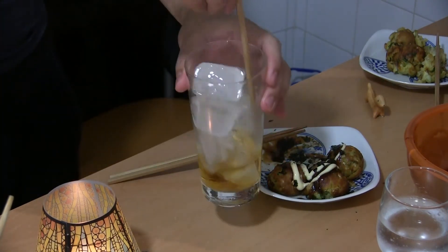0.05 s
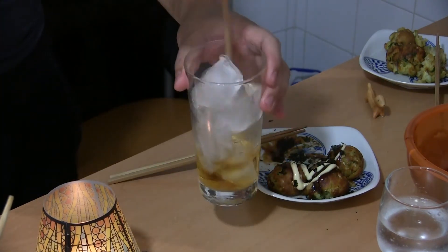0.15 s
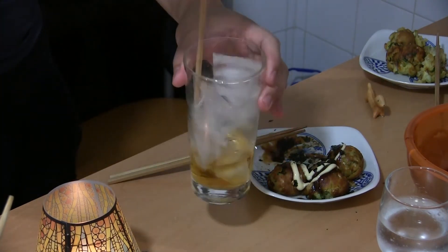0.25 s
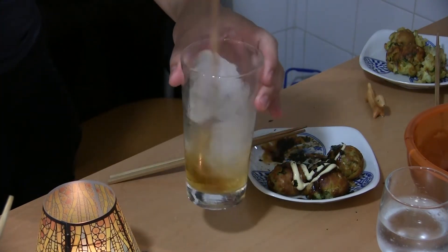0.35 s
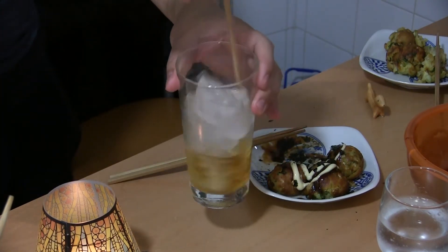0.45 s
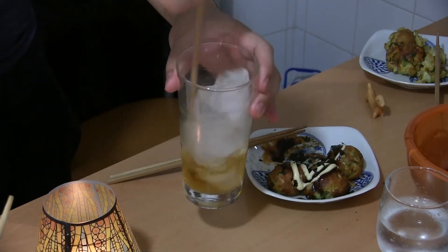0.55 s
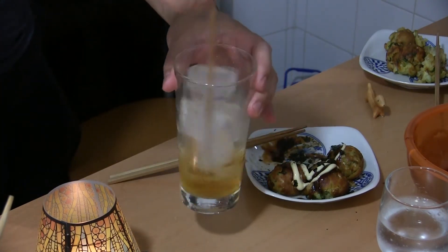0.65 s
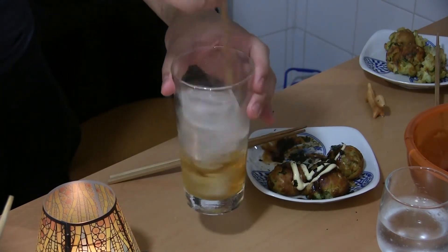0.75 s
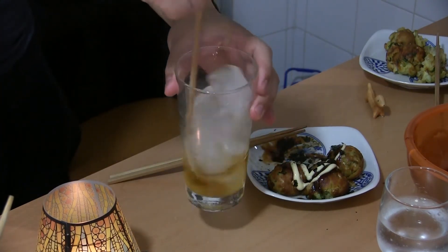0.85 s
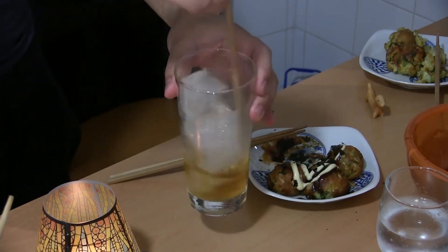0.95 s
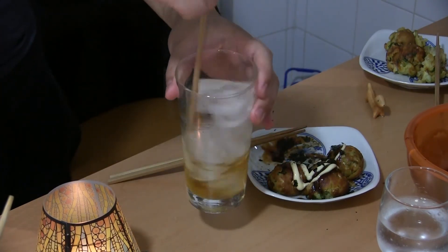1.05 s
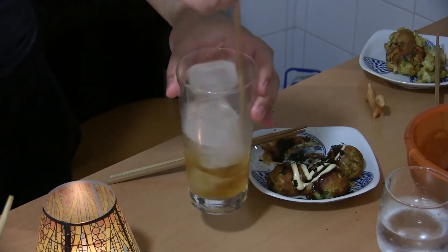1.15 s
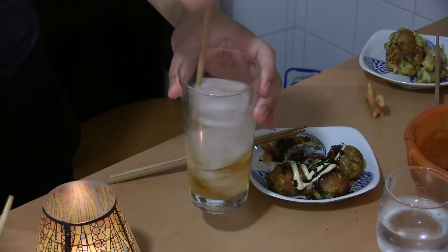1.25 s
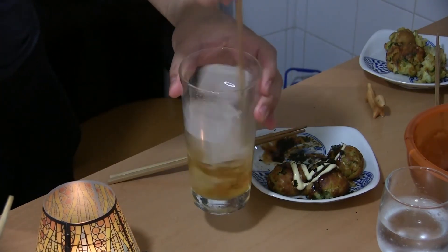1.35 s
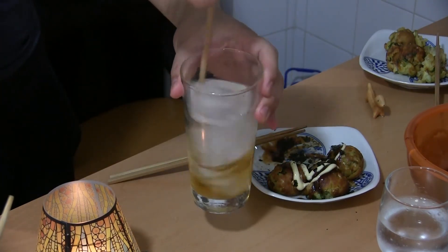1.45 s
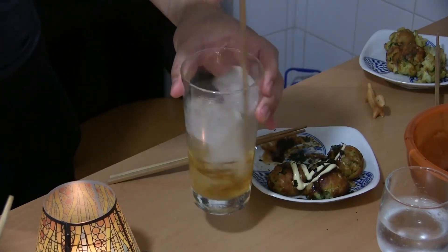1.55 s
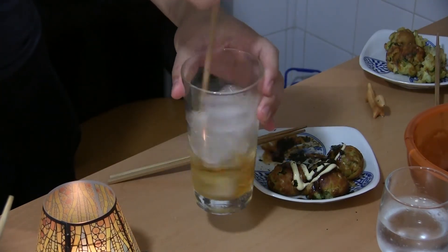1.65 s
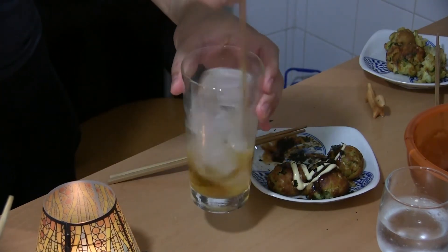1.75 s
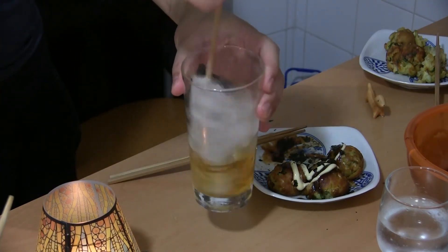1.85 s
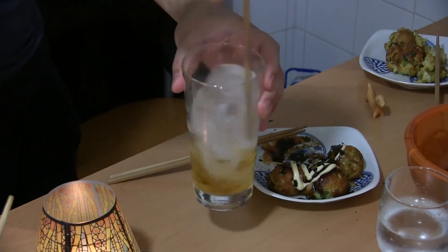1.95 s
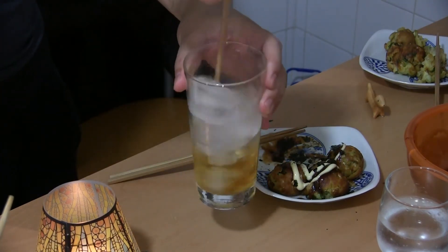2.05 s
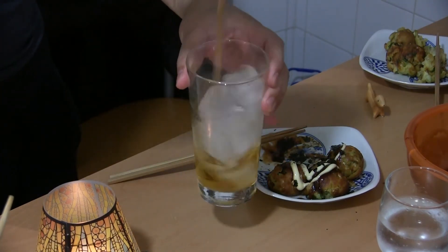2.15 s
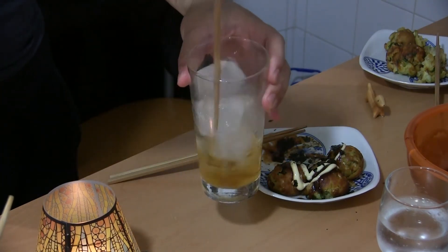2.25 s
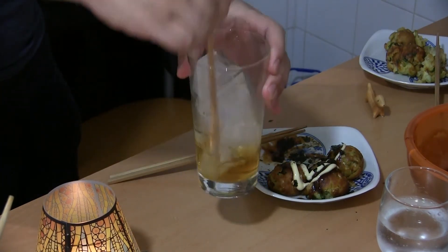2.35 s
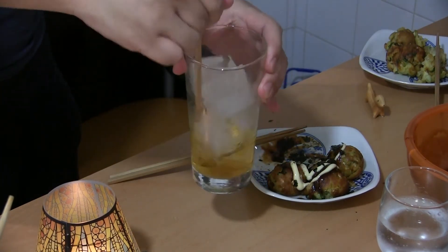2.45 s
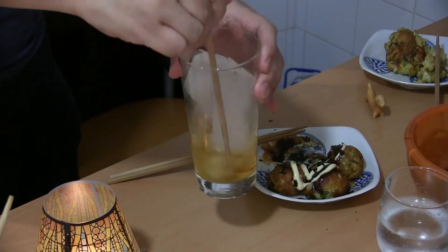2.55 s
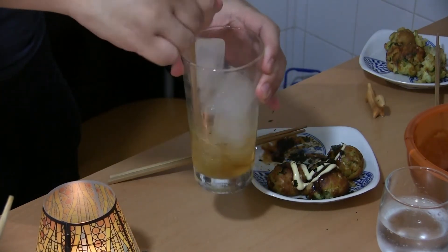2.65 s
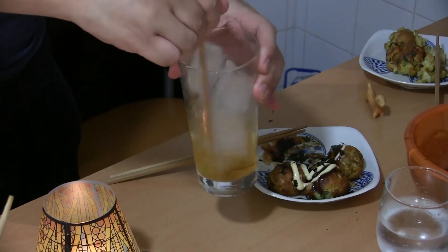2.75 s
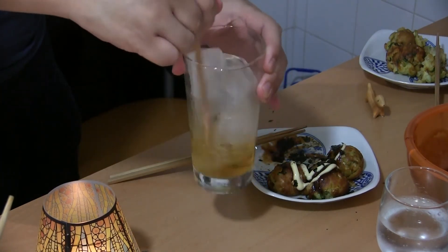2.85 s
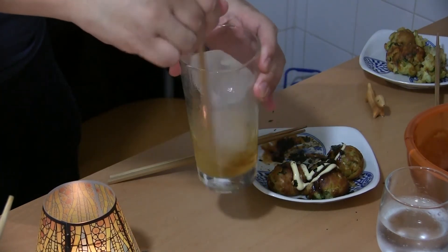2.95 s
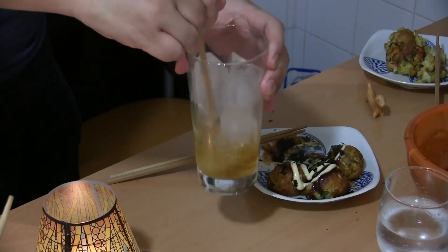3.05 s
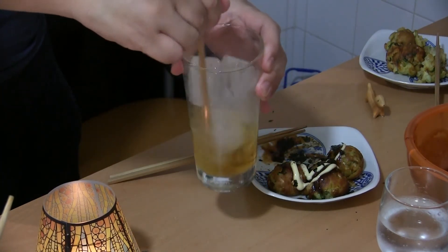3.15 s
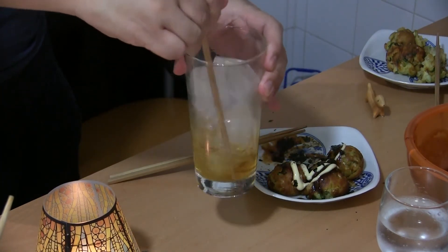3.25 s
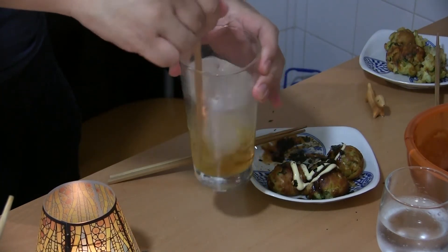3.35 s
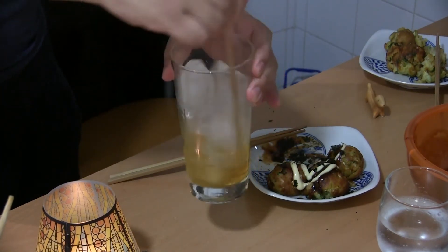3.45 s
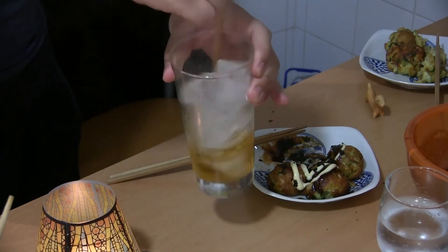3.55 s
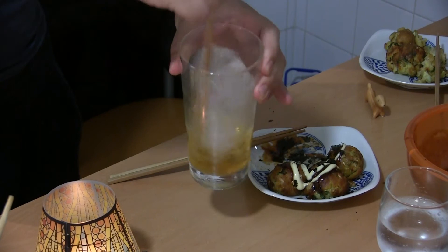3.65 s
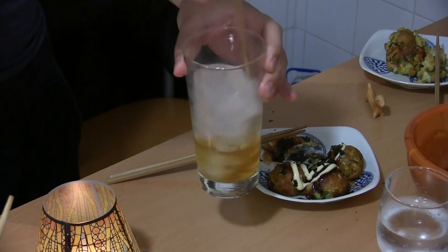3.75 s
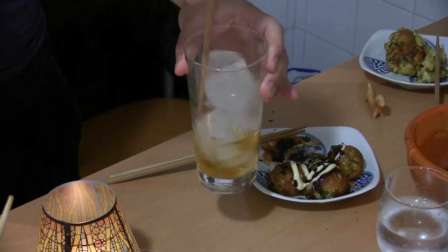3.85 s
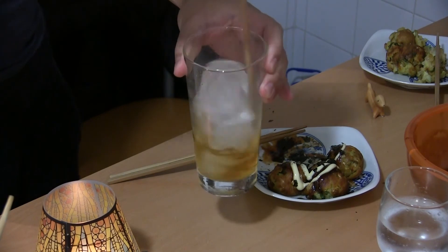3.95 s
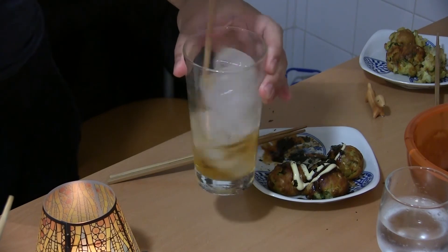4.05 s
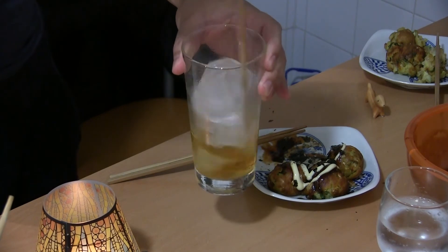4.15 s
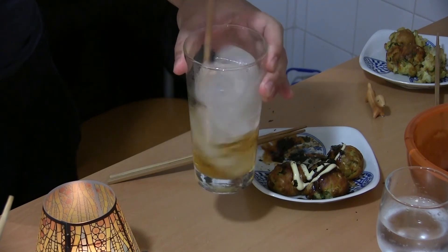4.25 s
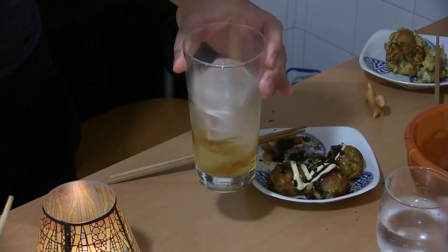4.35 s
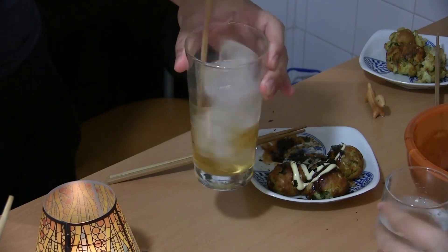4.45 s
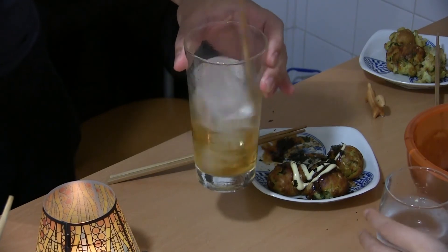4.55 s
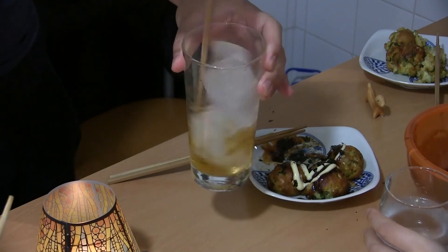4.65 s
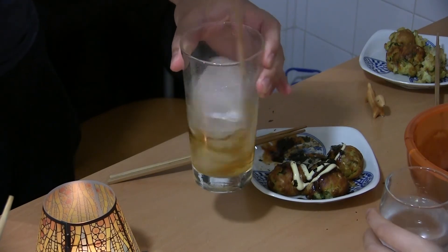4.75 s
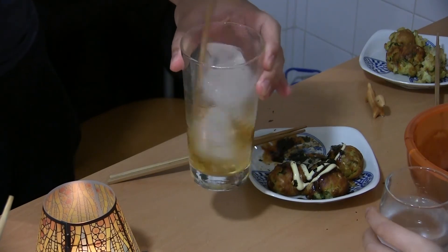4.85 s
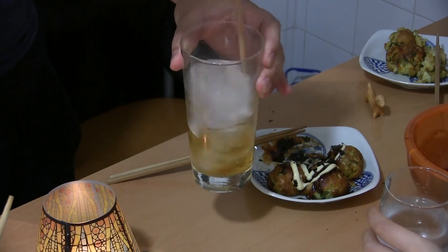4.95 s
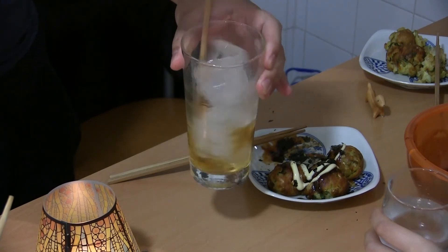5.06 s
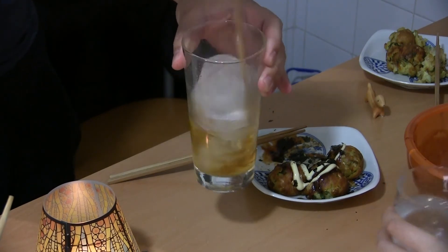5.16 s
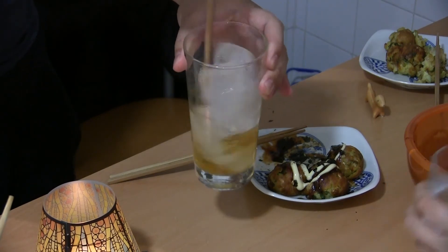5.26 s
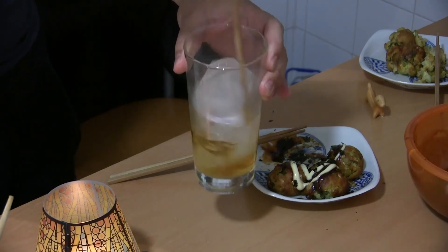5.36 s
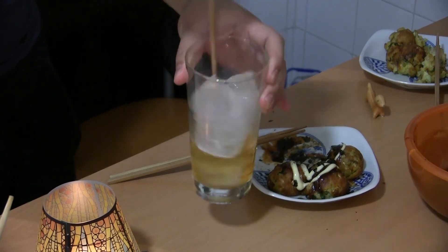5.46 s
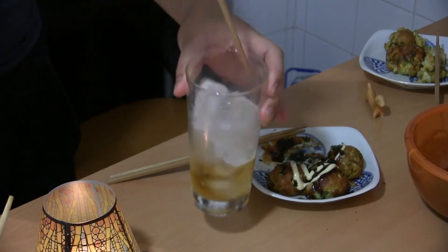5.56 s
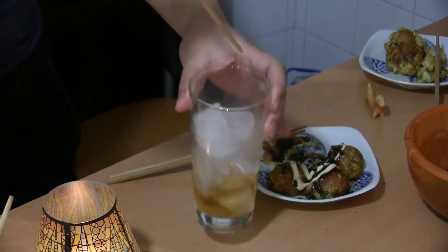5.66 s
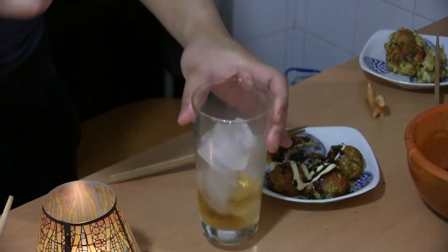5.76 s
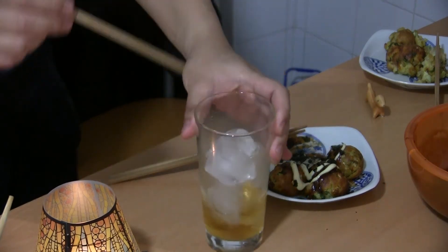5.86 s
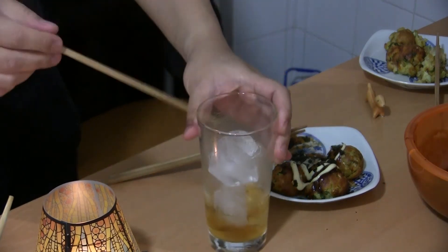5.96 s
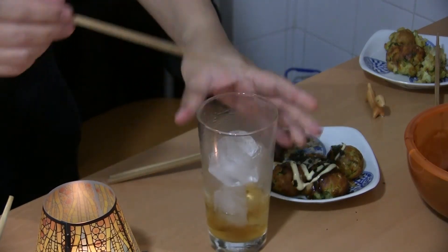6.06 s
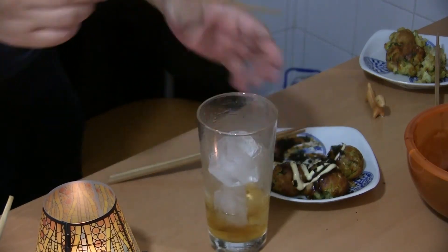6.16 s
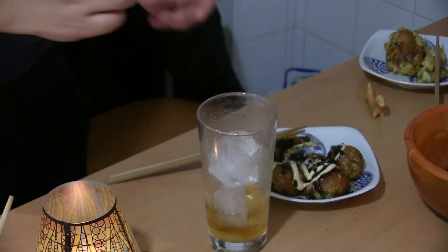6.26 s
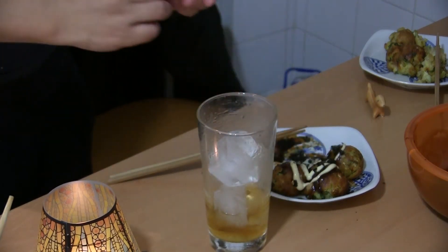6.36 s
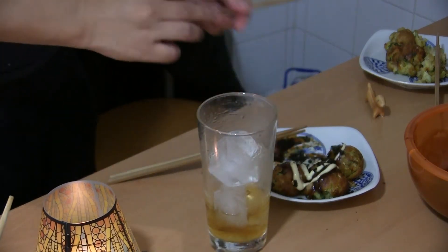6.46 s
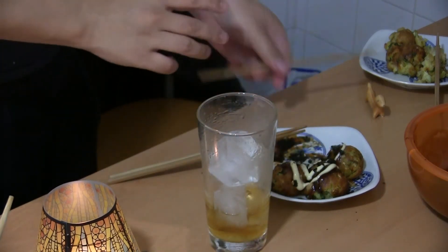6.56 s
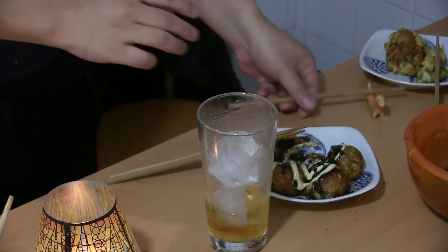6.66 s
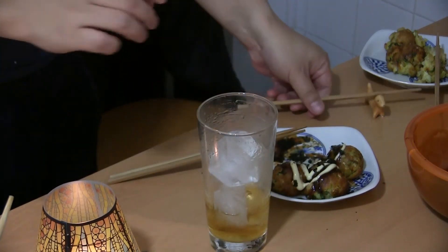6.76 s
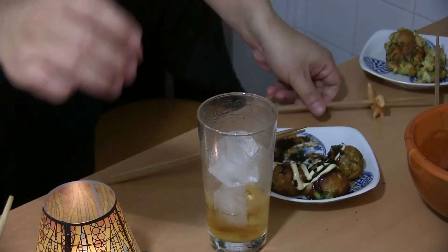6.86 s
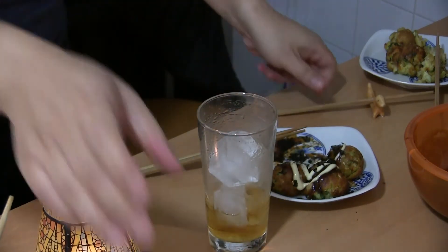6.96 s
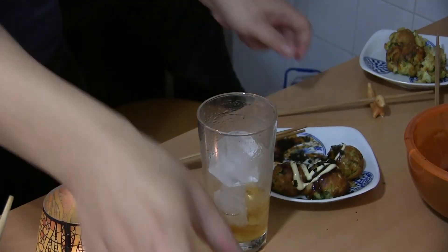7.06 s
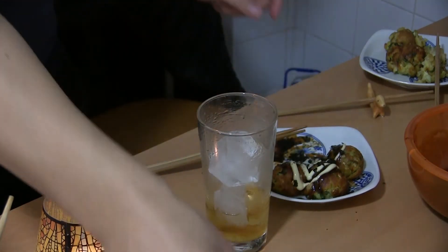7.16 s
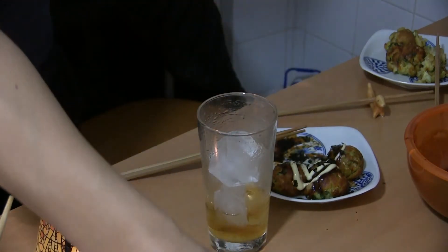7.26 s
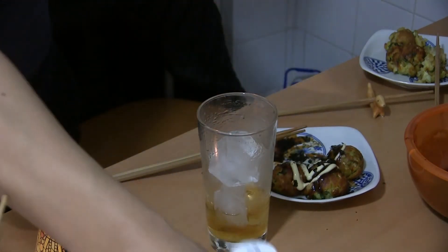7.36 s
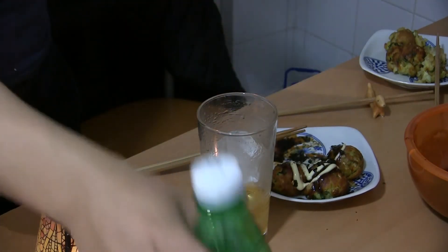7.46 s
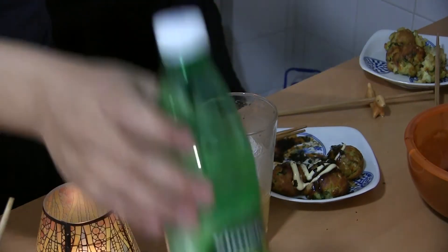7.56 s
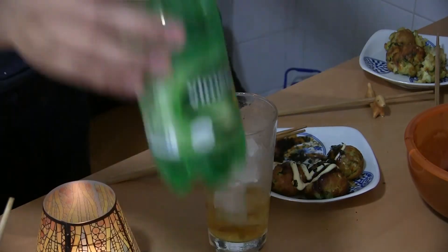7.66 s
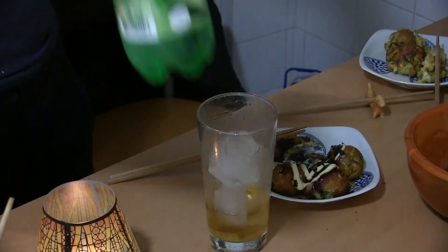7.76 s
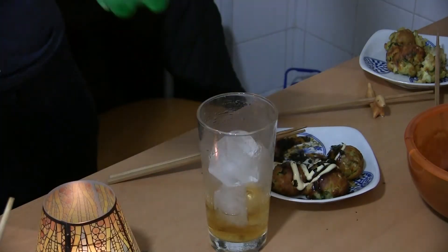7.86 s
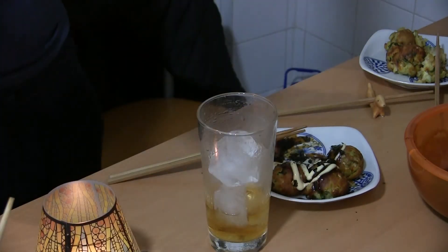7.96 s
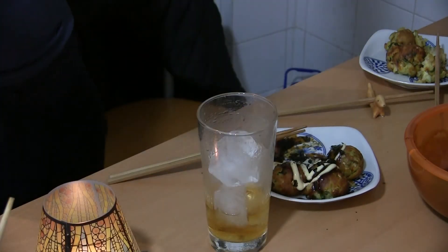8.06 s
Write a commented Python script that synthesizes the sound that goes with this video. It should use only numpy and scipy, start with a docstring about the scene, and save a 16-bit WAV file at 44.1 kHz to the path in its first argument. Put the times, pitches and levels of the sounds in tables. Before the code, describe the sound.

Close up in a small, tiled kitchen, ice is stirred briskly in a glass: dense, uneven knocks, bright clacks and hollow clunks, slackening briefly near one second and growing busiest around three. Near six seconds the tumbler is put down on wood with a loud, short thud and a tiny rattle. A chopstick ticks lightly against a dish, and crockery clinks once quietly. A faint low hum and room hiss continue to the end.

```python
"""Ice cubes knock about in a hand-held tumbler stirred with a chopstick, in a small tiled kitchen:
each blow sums decaying modes of wall and air hollow with short bursts of contact noise.
The tumbler is set down on a wooden table (table modes and a thud), the chopstick taps a dish
(wood and dish modes), and crockery clinks once. An appliance hums, a wavering sine, under room noise
shaped from random spectra; a gain control rides the loudest blows."""
import sys
import numpy as np
from scipy import signal
from scipy.fft import rfft, irfft
from scipy.io import wavfile
from scipy.ndimage import uniform_filter1d

SR = 44100
rng = np.random.default_rng(int(sys.argv[2]) if len(sys.argv) > 2 else 0)


def put_to_file(sound):
    """Save the sound as 16-bit audio at rate SR, in the file named by the first command-line argument."""
    columns = np.atleast_2d(sound).T  # one column per channel
    safe = np.clip(columns, -1, 1)
    whole_steps = np.round(safe * 32767)
    wavfile.write(sys.argv[1], SR, whole_steps.astype(np.int16))


N = 357651  # length in samples


def gain_of(db):
    """Level law: amplitude ratio is ten to the power of decibels over twenty."""
    return 10 ** (np.asarray(db) / 20)


def evened(x):
    """Normalization to unit root-mean-square amplitude."""
    return x / np.sqrt(np.mean(x ** 2) + 1e-20)


def read(points, hz):
    """Interpolation of a spectrum table along a logarithmic frequency axis."""
    f, value = np.transpose(points)
    return np.interp(np.log(hz + 1), np.log(f + 1), value)


def add(mix, s, sound):
    """Superposition: sums a sound in at second s, which may lie before the start."""
    at = round(s * SR)
    part, sound = mix[max(at, 0):], sound[max(-at, 0):]
    part[:len(sound)] += sound[:len(part)]


def highpass(x, order, hz):
    """Butterworth filtering: removes the part of a sound below hz."""
    return signal.sosfilt(signal.butter(order, hz, "high", fs=SR, output="sos"), x)


def rings(modes, size=4000, cycles=0.33, detune=0.):
    """Modal decay: one dying sine a row; contact time softens the start, loading detunes each mode."""
    hz, db, t60 = np.transpose(modes)[:, :, None]
    hz = hz * (1 + detune * rng.standard_normal(hz.shape))
    t = np.arange(size) / SR
    start = 1 - np.exp(-t * hz / cycles)
    return hz[:, 0], start * gain_of(db - 60 * t / t60) * np.sin(2 * np.pi * hz * t)


def strike(modes, chance, spread_db, near_hz=None, focus_db=0, broad_db=0):
    """Modal excitation: the spot struck sets sign and strength of each mode, favouring near_hz; peak 1."""
    hz, rows = modes
    chance = chance[:len(hz)]
    weight_db = spread_db * np.abs(chance)
    if near_hz:
        apart = np.log(hz / near_hz)
        weight_db = weight_db + focus_db * np.exp(-(apart / 0.076) ** 2)
        weight_db = weight_db + broad_db * np.exp(-(apart / 1.2) ** 2)
    sound = (np.sign(chance) * gain_of(weight_db)) @ rows
    return sound / np.abs(sound).max()


def crack(colour, noise, decay_s):
    """Brief contact excites a broad spectrum: a short burst of coloured noise of peak 1."""
    t, hz = np.arange(len(noise)) / SR, np.fft.rfftfreq(len(noise), 1 / SR)
    burst = irfft(rfft(noise) * gain_of(read(colour, hz)))
    burst *= (1 - np.exp(-t / 0.0005)) * np.exp(-t / decay_s)
    return burst / np.abs(burst).max()


def resonance(db, hz, t60_s, rise_s):
    """Single damped resonator: a sine with an exponential rise and decay."""
    t = np.arange(2000) / SR
    return gain_of(db - 60 * t / t60_s) * (1 - np.exp(-t / rise_s)) * np.sin(2 * np.pi * hz * t)


def rattle(knocks):
    """Random impact process: small blows follow the stirring effort and die down after each loud knock."""
    # stirring effort: start_s, level_db
    stir = [(0.0, -20), (0.47, -22), (0.62, -26), (0.9, -41), (1.15, -21), (1.79, -20), (2.05, -23.5),
            (2.35, -25), (2.74, -14), (3.3, -20), (3.45, -18), (3.66, -27.5), (4.16, -29), (4.34, -19.5),
            (4.45, -27), (4.88, -17.5), (5.45, -26.5), (5.64, -34.5), (5.8, -47.5)]
    count, settle_db_per_s = 450, -43
    hollow_db, clack_db, tick_db = -9.5, -5, -37  # shares in every small blow
    draw = rng.random((count, 3))
    at = (np.arange(count) + draw[:, 0]) / count * (stir[-1][0] + .1) - .1
    size_db = np.interp(at, *np.transpose(stir)) - 2.43 * np.log(draw[:, 1] + 0.014)  # many small, few large
    knocked = np.r_[-.1, np.array(knocks)[:, 0]]
    last_knock = knocked[np.maximum(np.searchsorted(knocked, at) - 1, 0)]
    size_db += settle_db_per_s * (at - last_knock)
    pitch_hz = 1200 * 4 ** draw[:, 2]
    shares = np.tile([hollow_db, clack_db, tick_db], (count, 1))
    return np.c_[at, size_db, pitch_hz, shares]


def rebounds(knocks):
    """Inelastic rebound: after each knock the cube strikes twice more, weaker."""
    bounces, again = np.array(knocks + knocks), rng.random((2 * len(knocks), 2))
    bounces[:, 0] += .004 + .03 * again[:, 0]  # delay, s
    bounces[:, 1] += -4. - 10.5 * again[:, 1]  # loss, dB
    return bounces


def ice(count=24):
    """Coupled resonators: wall, cube and air hollow ring; the pile loads them in one of count ways."""
    # loud knocks of ice on glass: start_s, level_db, pitch_hz (wall),
    # hollow_share_db, clack_share_db, tick_share_db
    knocks = [(0.01, -7.5, 1710, -54, -2.5, -30), (0.07, -8, 2700, -36, -1.5, -28),
              (0.092, -17, 2680, -3, -3, -30), (0.2016, -4.5, 2310, -18, -1.5, -41),
              (0.3267, -13.5, 2240, -9.5, -3, -12), (0.3436, -17, 1650, -9, -4, -33),
              (0.3711, -6.5, 1940, -34, -5.5, -42), (0.3857, -9.5, 1740, -37, -3.5, -32),
              (0.4476, -16.5, 1780, -18, -5, -39), (0.514, -9.5, 1595, -14, -13, -40),
              (0.5493, -10, 1774, -20, -3.5, -40), (0.6627, -19, 3000, -35, -2, -8),
              (0.765, -19.5, 2810, -18, -2.5, -29), (0.8766, -20.5, 2610, -19, -9, -27),
              (0.9457, -21, 1480, -6, -26, -28), (0.9931, -34, 1470, 11, -15, -30),
              (1.018, -21, 1620, -13, 5, -35), (1.089, -16, 2520, -29, -2.5, -33),
              (1.1219, -13.5, 4780, -22, 2, -33), (1.1762, -7.5, 1595, -3.5, -8, -36),
              (1.2336, -9, 3030, -15.5, 0, -33), (1.247, -15, 2020, -3, 6, -30),
              (1.3315, -13, 5030, -18, 3.5, -2.5), (1.352, -5.5, 2480, -28, -7, -25),
              (1.4097, -10.5, 1320, -6, -22, -27), (1.456, -17.5, 3580, -21, 0, -35),
              (1.495, -17, 2100, -28, 3, -34), (1.535, -15, 1660, -36, -17, -30),
              (1.5527, -5.5, 2430, -14.5, -0.5, -6.5), (1.6875, -8.5, 2900, -11, -1, -10),
              (1.7019, -6.5, 3110, -28, 4.5, -18), (1.7539, -7.5, 2910, -27, 0, -26),
              (1.8367, -7, 2995, -37, -4.5, -41), (1.9392, -15, 2390, -14, -9, -10),
              (1.9787, -13, 3220, -14, 2.5, -4.5), (2.1319, -25.5, 2160, -0.5, -21, -36.5),
              (2.2214, -7.5, 1400, -16, -6, -45), (2.261, -7.5, 1450, -12.5, -1, -38),
              (2.3397, -22, 1430, -4, -16, -35), (2.4179, -13, 2910, -8, -23, -33),
              (2.4875, -9, 1990, -4, 3.5, -18), (2.5102, -6, 2870, -4, -6, -17),
              (2.5431, -4.5, 1900, -21, 0.5, -26), (2.577, -8, 2010, -18, 1, -19),
              (2.6684, -9.5, 1560, -1.5, -20, -39), (2.7332, -8.5, 1930, -3, -12, -15),
              (2.77, -8.5, 1820, -29, 5.5, -5.5), (2.8042, -4.5, 2140, -11.5, -5, -11),
              (2.8814, -7.5, 2310, -2, -7, -37), (2.9801, -12, 2150, 1, -0.5, -14),
              (3.0096, -3, 1570, -5, -15, -25), (3.05, -6.5, 2090, 0, -7, -13),
              (3.097, -8, 1900, -9, -2, -24), (3.1577, -9, 1450, -19, -2, -15),
              (3.2071, -6, 2410, 0, -4, -13), (3.2648, -8, 1620, -3.5, -20, -30),
              (3.3147, -19.5, 1620, 1.5, -11, -2.5), (3.351, -5.5, 1440, -9.5, 1.5, -29),
              (3.389, -4, 2180, -15, -5, -27), (3.4191, -7, 2940, -6, -18, -41),
              (3.4535, -6, 1660, -22, -3.5, -38), (3.6031, -9.5, 2940, -27, -1, -24),
              (3.7055, -17, 1367, -31, -13, -37), (3.7511, -8, 1610, -30, -7.5, -26),
              (3.8021, -9, 2990, -20, -2.5, -28), (3.9, -13, 1650, -8, -25, -32),
              (3.9764, -10.5, 2260, -3, -26, -16), (4.005, -13, 1450, -2.5, -12, -24),
              (4.0846, -14, 2140, -5.5, -5, -36), (4.1405, -16, 2270, 1, -3, -22),
              (4.1914, -6, 1650, -25, -8, -13), (4.2541, -14.5, 1455, -35, -18, -22),
              (4.2951, -13.5, 4840, -36, 4.5, -35), (4.3285, -7.5, 2040, -40, -1.5, -39),
              (4.4301, -8.5, 1620, -6.5, -21, -12.5), (4.4919, -9.5, 1735, -19, -7, -20),
              (4.58, -28, 1300, 7.5, -20, -30), (4.6025, -4.5, 1330, -6.5, -18, -25),
              (4.6079, -15, 2170, -5.5, -26, -29), (4.6934, -4.5, 2000, -27, -9, -29),
              (4.7584, -6, 2910, -43, -7, -14), (4.81, -5, 2195, -10, 1, -33),
              (4.829, -8, 4400, -12, -5, -30), (4.9877, -8.5, 2320, -3, -2, -7.5),
              (5.04, -7.5, 1600, -14, -10, -22), (5.1218, -11, 2750, -37, -27, -42),
              (5.1821, -7.5, 3000, 0.5, -4, -1), (5.205, -8, 1110, -10.5, -18, -25),
              (5.294, -8, 2020, -7.5, -31, -15), (5.3745, -9.5, 2060, -11, -26, -13),
              (5.4265, -5, 2260, -4.5, -22, -11), (5.5847, -12.5, 1790, -6, -36, -27),
              (5.667, -16, 1760, -33, -11, -23), (5.7342, -16.5, 1813, -15.5, -20, -25)]
    # air hollow among the cubes: pitch_hz, level_db, t60_s
    hollow_modes = [(694.5, -2.5, 0.056), (686, -17, 0.1), (753, -6.5, 0.039), (787.3, -3.5, 0.064),
                    (902, 11, 0.007), (930, 3.5, 0.017), (988, 2.5, 0.011)]
    # hand-damped tumbler wall: pitch_hz, level_db, t60_s
    wall_modes = [(1073, -13.5, 0.032), (1310, -1.5, 0.029), (1376, -4, 0.016), (1374.6, -7.5, 0.053),
                  (1503, -5, 0.053), (1654, 1, 0.026), (1664, -6.5, 0.033), (1786, -2, 0.015),
                  (1822, 0.5, 0.019), (2054, 2.5, 0.017), (2243, 1.5, 0.027), (2366, 0, 0.0094),
                  (2534, -11, 0.25), (2724, 1, 0.013), (2824, -0.5, 0.038), (3176, 5, 0.012),
                  (3570, 0, 0.014), (3830, -8, 0.029)]
    # bright clack of the tumbler: pitch_hz, level_db, t60_s
    clack_modes = [(4300, -5, .008), (4800, -3, .009), (5300, 0, .012), (5650, -2, .01), (7600, -7, .007),
                   (8400, -9, .006), (10600, -12, .006), (12400, -16, .005)]
    # spectrum of first contact: frequency_hz, level_db (per Hz)
    contact_colour = [(290, -58), (500, -1), (807, -32), (1090, -5.5), (1670, -6.5), (4340, -6.5),
                      (5470, -14), (6700, -15), (11000, -24), (16000, -83)]
    # spectrum of a cube's hard edge: frequency_hz, level_db (per Hz)
    edge_colour = [(7000, -0.5), (9500, 1), (12000, -3), (16000, -10)]
    # bright ticks of cube on cube: start_s, level_db
    edge_ticks = [(0.5344, -37), (1.1917, -22), (1.3958, -19), (4.7887, -13), (5.3827, -13), (5.507, -16),
                  (5.5707, -18.5), (5.994, -22.5), (6.029, -30), (6.0694, -30), (6.0994, -39)]
    # pitch of the air hollow as the pile of cubes shifts: start_s, pitch_hz
    pocket = [(0.0, 769), (0.3, 660), (0.75, 782), (1.0, 780), (1.2, 736), (2.0, 761), (2.6, 799),
              (3.0, 792), (3.25, 831), (3.45, 733), (3.95, 753), (4.4, 843), (4.65, 771), (5.0, 832),
              (5.8, 811)]
    pocket_scatter = 0.046  # full width of the random spread, as a share of that pitch

    loads = [(rings(hollow_modes, cycles=0.95, detune=0.026), rings(wall_modes, detune=0.018),
              rings(clack_modes, size=1500, detune=0.032)) for _ in range(count)]
    blows, out = np.r_[knocks, rebounds(knocks), rattle(knocks)], np.zeros(N)
    pocket_hz = np.interp(blows[:, 0], *np.transpose(pocket))
    pocket_hz *= 1 + pocket_scatter * (rng.random(len(blows)) - .5)
    for k, chance in enumerate(rng.standard_normal((len(blows), 1104))):
        s, db, hz, low_db, high_db, top_db = blows[k]
        low_hz = pocket_hz[k]
        hollow, wall, clack = loads[k % count]
        add(out, s, gain_of(db) * strike(wall, chance, 3.3, hz, focus_db=4.5, broad_db=2.0))
        add(out, s, resonance(db - 7.0, hz, 0.038, 0.0011))  # the cube's own ring
        add(out, s, gain_of(db + low_db) * strike(hollow, chance[30:], 2.3, low_hz, focus_db=11.0))
        add(out, s, resonance(db + low_db - 3.5, low_hz, 0.087, 0.0028))  # air pocket of the moment
        add(out, s, gain_of(db + high_db) * strike(clack, chance[60:], 4., hz, focus_db=10.0))
        add(out, s, gain_of(db - 7.) * crack(contact_colour, chance[80:592], 0.0025))
        add(out, s, gain_of(db + top_db) * crack(edge_colour, chance[592:], 0.0047))
    for (s, db), chance in zip(edge_ticks, rng.standard_normal((len(edge_ticks), 512))):
        add(out, s, gain_of(db) * crack(edge_colour, chance, 0.0033))
    return out


def kitchen(x):
    """Reverberation: sparse echoes of random sign off the tiles, each band dying at its own speed."""
    # reverberation time: frequency_hz, t60_s
    room = [(200, 0.17), (800, 0.39), (2500, 0.37), (6000, 0.32), (14000, 0.41)]
    # echoes shared by both sides: frequency_hz, share (0-1)
    alike = [(100, 1), (500, 0.79), (2000, 0.66), (5000, 0.53), (14000, 0.82)]
    echoes = np.zeros((3, SR // 2))  # left, right, shared
    at = np.arange(120, SR // 2 - 16, 16)
    at = at + rng.integers(0, 16, (3, len(at)))
    np.put_along_axis(echoes, at, rng.choice([-1., 1.], at.shape), 1)
    hz, t, z = signal.stft(echoes, SR, nperseg=256)
    share = np.clip(read(alike, hz), 0, 1)[:, None]
    z = np.sqrt(share) * z[2] + np.sqrt(1 - share) * z[:2]
    tail = signal.istft(z * gain_of(-60 * t / read(room, hz)[:, None]), SR, nperseg=256)[1]
    return signal.fftconvolve(x[None], tail / np.linalg.norm(tail[0]), axes=1)[:, :N]


def air():
    """Partly coherent noise field: random short-time spectra with faint drifting patches."""
    # spectrum of the room noise: frequency_hz, level_db (per Hz, relative)
    air_colour = [(15, -30), (28, -26), (60, -48), (92, -7), (145, -1.5), (195, -6.5), (301, -2.5),
                  (344, -4), (394, -1.5), (607, -6), (887, -13), (2690, -23.5), (9570, -29), (14800, -39.5),
                  (16000, -51)]
    # left-right likeness: frequency_hz, coherence
    likeness = [(60, 1), (240, 0.74), (950, 0.69), (3770, 0.48), (15000, 0.67)]
    frames, hz = N // 512 + 5, np.fft.rfftfreq(2048, 1 / SR)
    a, b, c, d, patches = rng.standard_normal((frames, 1025, 5)).T
    patches = evened(uniform_filter1d(uniform_filter1d(patches, 10, 0), 8, 1))
    same, left = np.clip(read(likeness, hz), -1, 1)[:, None], a + 1j * b
    right = same * left + np.sqrt(1 - same ** 2) * (c + 1j * d)
    z = np.array([left, right]) * gain_of(read(air_colour, hz)[:, None] + 1.3 * patches)
    noise = signal.istft(z, nperseg=2048, noverlap=1536)[1][:, :N]
    return gain_of(-43) * evened(noise)


def hum():
    """Frequency modulation: a low appliance tone whose pitch wavers a little."""
    centre_hz, waver_hz, level_db = 197, 2.49, -45.5  # waver is rms
    waver = evened(uniform_filter1d(uniform_filter1d(rng.standard_normal(N), 3000), 3000))
    tone = np.sqrt(2) * np.sin(2 * np.pi * np.cumsum(centre_hz + waver_hz * waver) / SR)
    return gain_of(level_db) * tone * gain_of([[.5], [-.5]])  # slightly to the left


def set_down():
    """Impact on a plate: the thick base lands, excites the table top's modes and rocks to rest."""
    # tumbler landing and rocking: start_s, level_db
    landings = [(5.9392, -0.5), (5.958, -4.5), (6.022, -10.5), (6.049, -11), (6.08, -13), (6.104, -17)]
    # table top modes: pitch_hz, level_db, t60_s
    table_modes = [(238, -10, 0.16), (347, -8, 0.074), (437, 11.5, 0.019), (517, 8, 0.019), (754, 8, 0.014),
                   (1146, 2.5, 0.04), (1520, 1, 0.037), (1830, -5, 0.03)]
    # contact spectrum: frequency_hz, level_db (per Hz)
    thud_colour = [(88, -39), (150, -8), (267, -4), (486, -2.5), (757, -5.5), (1180, -4), (1380, -8),
                   (3470, -20.5), (15000, -53.5)]
    table, out = rings(table_modes), np.zeros(N)
    for k, ((s, db), chance) in enumerate(zip(landings, rng.standard_normal((len(landings), 1000)))):
        push = chance if k else np.abs(chance)  # first landing drives all modes with one sign
        add(out, s, gain_of(db) * strike(table, push, 3.7))
        add(out, s, gain_of(db - 3.5) * crack(thud_colour, chance, 0.0059))
    return out


def chopstick():
    """Collision of two resonators: light wooden taps of the chopstick sound both stick and dish."""
    # taps: start_s, level_db, stick_share_db, dish_share_db
    tap_list = [(6.449, -31, -14, -16), (6.763, -16.5, -4.5, -13.5), (6.838, -23.5, -24, -7),
                (6.919, -18.5, -3, -8), (6.942, -23, -8, -16), (6.959, -10.5, -11.5, -5.5),
                (6.972, -16.5, -8, -21), (7.014, -16, -6, -8.5), (7.039, -15, -9.5, -19),
                (7.059, -19, -11, -11), (7.084, -30, -13, -16)]
    # stick modes: pitch_hz, level_db, t60_s
    stick_modes = [(904, -6, 0.032), (1060, 2, 0.013), (1440, 0, 0.015), (1686, -3.5, 0.029),
                   (2130, 0, 0.011), (2700, 4, 0.004)]
    # dish modes: pitch_hz, level_db, t60_s
    dish_modes = [(4860, -2, .01), (6160, 4, 0.067), (9500, -9, .03), (10330, -4, .06)]
    # contact spectrum of wood on glaze: frequency_hz, level_db (per Hz)
    glaze_colour = [(2000, -25), (3000, 0), (4500, 1), (6000, 1.5), (10000, -6), (16000, -26)]
    out = np.zeros(N)
    for (s, db, stick_db, dish_db), chance in zip(tap_list, rng.standard_normal((len(tap_list), 552))):
        stick, dish = rings(stick_modes, detune=0.052), rings(dish_modes, detune=0.0069)
        add(out, s, gain_of(db + stick_db + 0.5) * strike(stick, chance, 2.3))
        add(out, s, gain_of(db + dish_db - 16.5) * strike(dish, chance[20:], 5.1))
        add(out, s, gain_of(db + dish_db - 2.0) * crack(glaze_colour, chance[40:], 0.003))
    return out


def crockery():
    """Free vibration: one clink rings all modes of the crockery, with random signs."""
    # the clink: start_s, level_db
    s, db = (7.6, -23.5)
    # crockery modes: pitch_hz, level_db, t60_s
    crockery_modes = [(900, 1, 0.04), (1220, -4, 0.029), (1390, -2, 0.037), (2230, -3, 0.019),
                      (2930, -2, 0.021), (3440, -16, 0.062), (3460, 2, 0.028), (4170, -12, 0.067),
                      (4800, -20, .4), (5530, 6, 0.016), (5650, -13, 0.051), (6358, -12, 0.17)]
    out = np.zeros(N)
    add(out, s, gain_of(db) * strike(rings(crockery_modes, size=16000), rng.standard_normal(20), 0))
    return out


def scene():
    """Superposition of direct sound, room and background; small objects radiate no deep bass."""
    glass = highpass(ice(), 3, 520.)
    table, dish = set_down(), chopstick() + crockery()
    wet = gain_of(4.0) * glass + gain_of(4.5) * table + gain_of(6.5) * dish
    near = glass + table + dish + kitchen(wet)
    return highpass(near, 4, 170.) + air() + hum()


def record(dry):
    """Compression by smoothed loudness, rounding of peaks, microphone bass cut and band limit."""
    threshold_db, makeup_db, slope = -17.5, 3.0, 0.57  # slope: dB of gain lost per dB over
    recovery_db_per_s, smoothing_s, ceiling, edge_hz = 14.0, .06, .97, 16150
    keep = np.exp(-1 / (smoothing_s * SR))
    power_db = 10 * np.log10(signal.lfilter([1 - keep], [1, -keep], (dry ** 2).mean(0)) + 1e-12)
    fall = np.arange(N) * recovery_db_per_s / SR
    held_db = np.maximum.accumulate(power_db + fall) - fall  # peaks held, falling at the recovery rate
    over_db = np.maximum(held_db - threshold_db, 0)
    held = ceiling * np.tanh(gain_of(makeup_db - slope * over_db) * dry)
    held = highpass(held, 2, 48.)
    band_limit = signal.firwin(511, edge_hz, window=("kaiser", 9), fs=SR)
    return signal.oaconvolve(held, band_limit[None], "same")


dry = scene()
out = record(dry)
put_to_file(out)
```